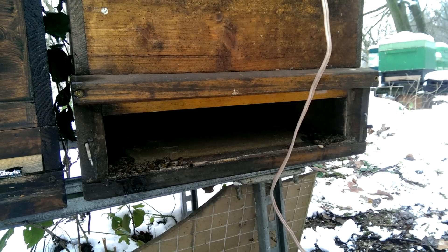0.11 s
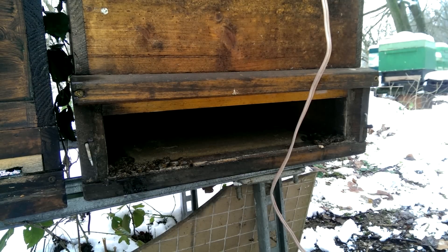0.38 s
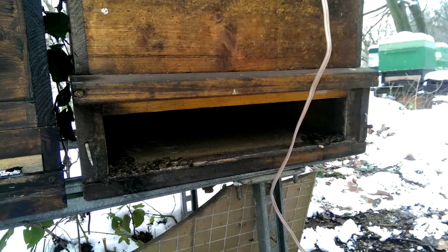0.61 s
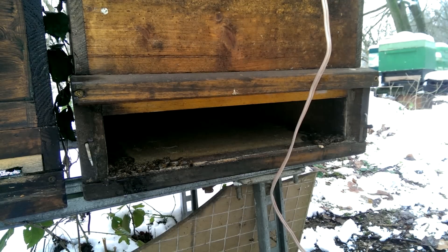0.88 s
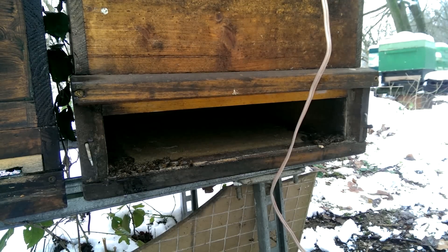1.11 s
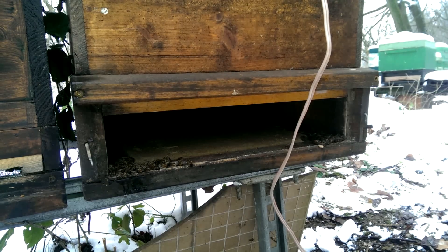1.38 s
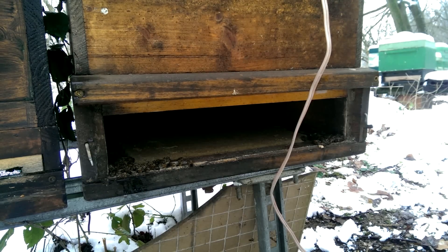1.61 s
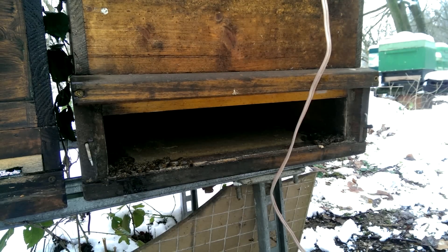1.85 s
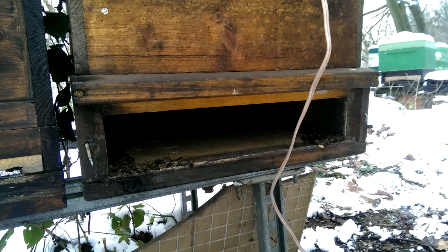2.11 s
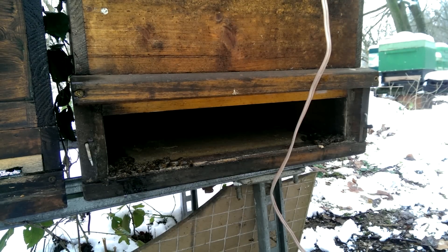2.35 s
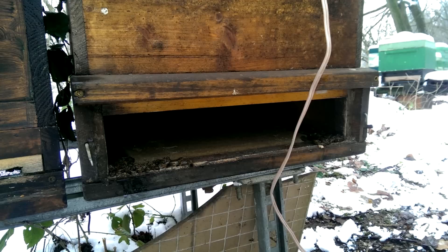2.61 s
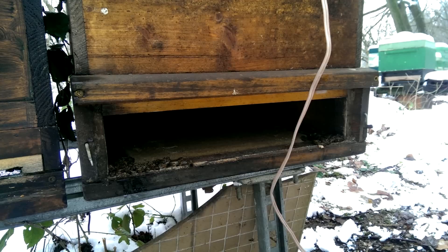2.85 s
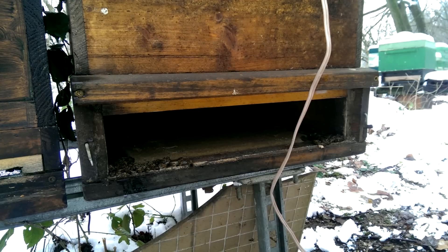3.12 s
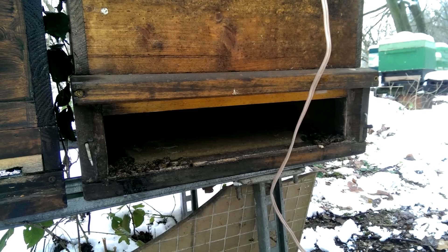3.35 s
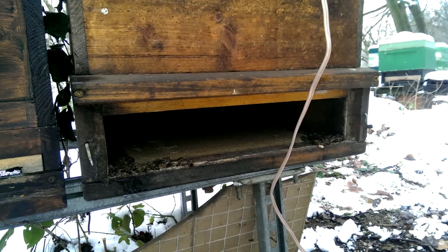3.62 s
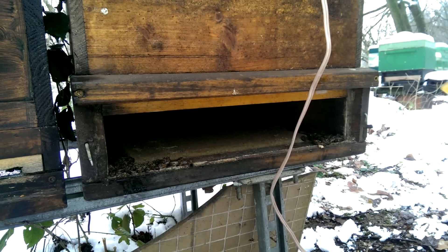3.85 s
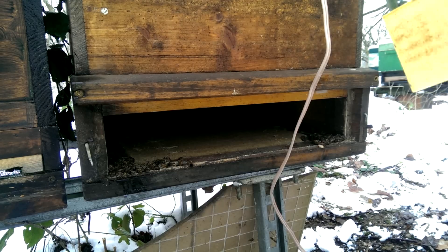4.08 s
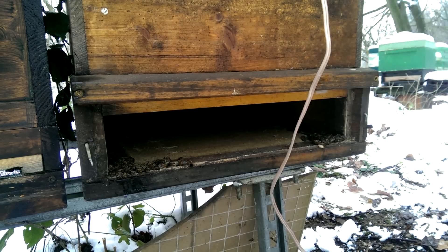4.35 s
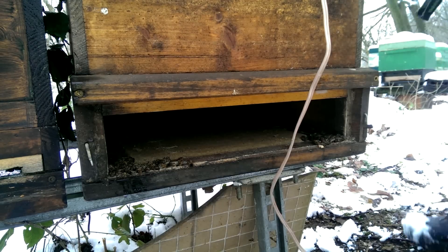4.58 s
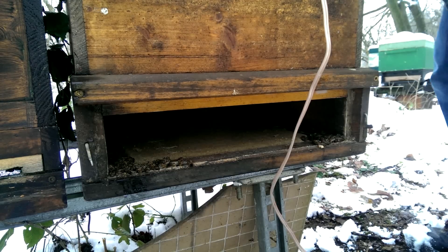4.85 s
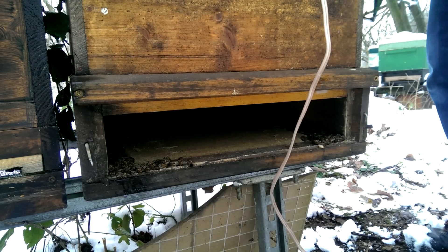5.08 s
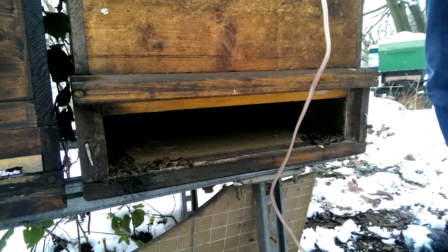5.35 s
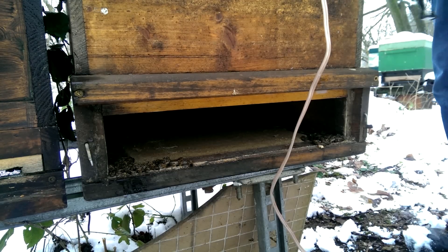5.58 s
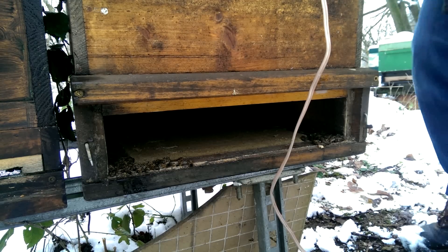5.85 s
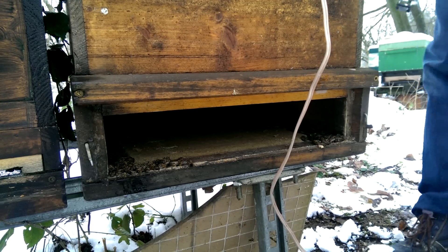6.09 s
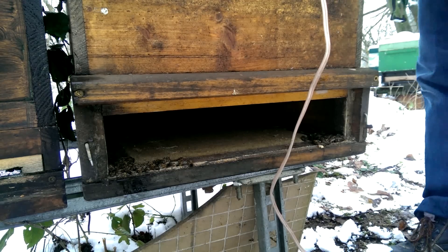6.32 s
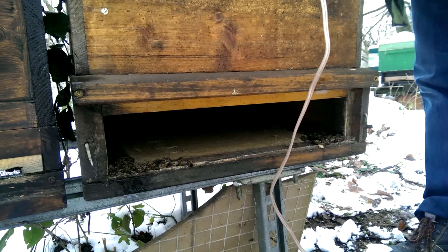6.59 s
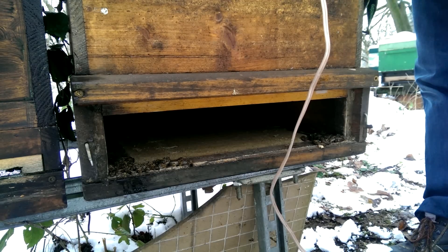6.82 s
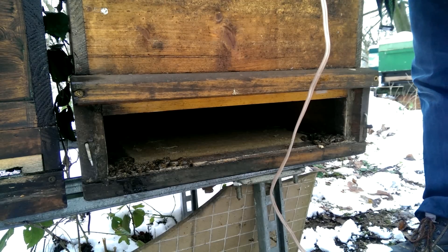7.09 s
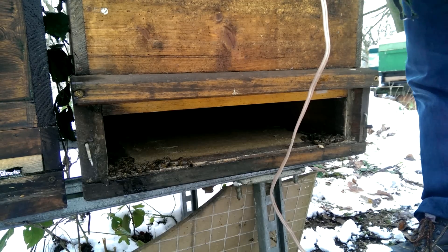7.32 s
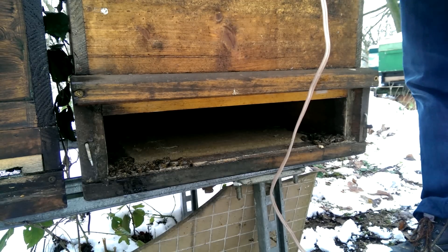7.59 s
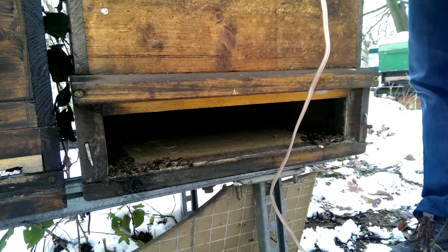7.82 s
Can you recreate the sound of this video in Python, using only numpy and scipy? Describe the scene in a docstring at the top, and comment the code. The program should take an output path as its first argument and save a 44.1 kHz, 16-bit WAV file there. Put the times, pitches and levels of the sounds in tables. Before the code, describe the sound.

Busy wooden rattling and sliding at a beehive, a sharp hard slam after three seconds, then sparse light taps and low hollow rubbing.

```python
"""Outdoors at a hive, wooden boards are slid, knocked and set down, a little to the right of a two-port microphone.
Each contact makes a crack of noise, a panel knock and a boom; dull bumps come alone or under a crack.
Slides are grainy noise for the scrape, wavering noise in the panels and plain noise booming in two boxes.
One board lands hard, edge after edge, rings in its own resonances and leaves a long ring.
Short echoes answer from nearby, over shaped noise for a far-off hiss and a low rumble."""
import sys
import numpy as np
from scipy import signal
from scipy.fft import rfft, irfft, next_fast_len
from scipy.io import wavfile
from scipy.ndimage import uniform_filter1d, map_coordinates

SR = 44100
rng = np.random.default_rng(int(sys.argv[2]) if len(sys.argv) > 2 else 0)


def boost(x):
    """Linear amplitude factor 10**(x/20) for a level x in decibels (scalar or array-like)."""
    u = np.asarray(x, float) / 20
    return 10 ** u


def wav_out(sig):
    """Save sig, one row per channel (or a flat mono array), as 16-bit PCM at SR to the path in sys.argv[1]."""
    wavfile.write(sys.argv[1], SR, np.round(np.clip(np.atleast_2d(sig).T, -1, 1) * 32767).astype(np.int16))


N = 350595  # length of the scene in samples

# Surroundings and place of the boards over time. Each row: time in seconds, rumble level in dB, hiss level in dB,
# left level over right level of the handling in dB, delay of its sharp sounds at the left port in ms.
AROUND = [(0, -61.5, -55.5, -0.5, 0.27), (2.9, -64, -55.5, -1, 0.31), (3.3, -69, -56, -2, 0.26),
          (3.8, -62.5, -54, -3.5, 0.23), (5.2, -60, -55, -2.5, 0.24), (6.6, -63.5, -54.5, -2, 0.11),
          (7.95, -65, -57.5, -0.5, 0.17)]
# The boom of the large box, then of the small one. Each row: pitch in Hz, width in Hz, level in dB.
BOX = [(104, 24, 0), (203, 20, 0)]
# Mostly the small box is handled, then mostly the large, duller one.
# Each row: time in seconds, share of the small box (0 to 1).
HANDLED = [(5.95, 0.86), (6.1, 0.056)]


def unit(x):
    """Scaled to an rms of 1."""
    return x / np.sqrt(np.mean(np.abs(x) ** 2) + 1e-20)


def along(points, hz):
    """Reads a curve of (Hz, value) points, with pitch on a log axis."""
    f, v = np.transpose(points)
    return np.interp(np.log(hz + 1), np.log(f + 1), v)


def curves(rows):
    """One value per sample for each column after the time."""
    s, *columns = np.transpose(rows)
    return np.array([np.interp(np.arange(N) / SR, s, column) for column in columns])


def wobble(rate):
    """A smooth random curve, with this many random points a second."""
    points = rng.standard_normal(int(N * rate / SR) + 4)
    return map_coordinates(points, [np.arange(N) * rate / SR])


def filtered(x, response):
    """Shapes a sound by a response over pitch, scaled so that white noise keeps its power."""
    size = 2 * next_fast_len(N // 2 + SR // 4)  # room for the ringing after the end
    gain = unit(response(np.fft.rfftfreq(size, 1 / SR)))
    return irfft(rfft(x, size) * gain, size)[..., :N]


def modes(table):
    """Sum of resonances, each ringing only after it is pushed; every second one has its sign flipped."""
    def response(f):
        total = 0
        for k, (center, width, db) in enumerate(table):
            damping = 1j * f * width
            total = total + (-1) ** k * boost(db) * damping / (center * center - f * f + damping)
        return total
    return response


def causal(points):
    """A filter with a given loudness curve over pitch that answers as early as possible (minimum phase)."""
    def response(hz):
        cepstrum = irfft(np.log(boost(along(points, hz)) + 1e-6))
        half = len(cepstrum) // 2
        cepstrum[1:half] *= 2
        cepstrum[half + 1:] = 0
        return np.exp(rfft(cepstrum))
    return response


def add(track, s, sound):
    """Mixes a sound in at a time in seconds."""
    part = track[..., round(s * SR):round(s * SR) + sound.shape[-1]]
    part += sound[..., :part.shape[-1]]


def burst(db, t60, rise):
    """A contact force that jumps up over rise seconds and falls by 60 dB in t60 seconds."""
    t = np.arange(SR // 4) / SR
    return boost(db - 60 * t / t60) * (1 - np.exp(-t / rise))


def boom(db, hz, t60):
    """The wood swings as a dying sine."""
    swing = np.sin(2 * np.pi * hz * np.arange(SR // 4) / SR)
    return -burst(db, t60, rise=0.31 / hz) * swing


def spread(count):
    """Noise from along a board's edge: partly common to both ports, partly each port's own."""
    common, *own = rng.standard_normal((3, count))
    return 0.47 * common + 1.194 * np.array(own)


def patchy(x, depth_db):
    """Random patches of pitch and time get louder or softer, as the contact moves along the board."""
    z = signal.stft(x, nperseg=512)[2]
    field = rng.standard_normal(z.shape[-2:])
    field = uniform_filter1d(field, size=3, axis=0)  # neighbours in pitch
    field = uniform_filter1d(field, size=7, axis=1)  # neighbours in time
    return unit(signal.istft(z * boost(depth_db * unit(field)), nperseg=512)[1][..., :N])


def background():
    """Far hiss, alike at both ports only in the bass, over a low rumble; the hiss wavers."""
    # Colour of the hiss. Each row: pitch in Hz, level in dB.
    hiss_color = [(47, 2), (80, 0.5), (159, 0), (237, -9), (461, -6.5), (672, -12), (785, -1.5), (1090, -6),
                  (1250, -2), (1430, -5.5), (2040, -5), (3170, -7), (6030, -25.5), (14300, -28),
                  (16000, -34)]
    # How alike the hiss is at both ports. Each row: pitch in Hz, likeness (1 the same, 0 unrelated, below 0 opposed).
    likeness = [(60, 0.9), (150, 0.86), (380, 0.82), (950, 0.21), (2380, -0.21), (5980, 0.081),
                (15000, -0.08)]

    def mid_and_side(hz):
        angle = np.arccos(np.clip(along(likeness, hz), -1, 1)) / 2
        return boost(along(hiss_color, hz)) * np.array([np.cos(angle), np.sin(angle)])

    rumble_db, hiss_db = curves(AROUND)[:2]
    mid, side = filtered(rng.standard_normal((2, N)), mid_and_side)
    hiss = boost(hiss_db - 1.0 + 1.07 * wobble(10)) * unit(np.array([mid + side, mid - side]))
    rumble_noise = rng.standard_normal(N) + 0.16 * rng.standard_normal((2, N))  # mostly common to both ports
    rumble = unit(filtered(rumble_noise, lambda f: modes([(49, 12, 0)])(f) ** 2))
    return hiss + boost(rumble_db + 4.0) * rumble


def strokes():
    """Sliding wood catches and slips: grainy noise drives the grit, wavering noise the panel, plain noise the box."""
    # Slides. Each row: start in seconds, length in seconds, scrape level in dB,
    # weight resting on the box in dB over the scrape.
    slides = [(0.018, .08, -50, 0.5), (0.124, 0.068, -46, -2), (0.259, 0.13, -40, -9),
              (0.417, 0.18, -28.5, -22), (0.581, 0.2, -36, -13.5), (0.787, 0.12, -28, -10.5),
              (0.946, 0.16, -33, -35), (1.247, .13, -42, -6.5), (1.371, 0.13, -37, -8),
              (1.505, 0.098, -40, -3), (1.662, .09, -52.5, -25), (1.911, .085, -44, -3),
              (2.024, 0.06, -36.5, -2.5), (2.064, 0.15, -30, -17.5), (2.189, 0.1, -34, -4.5),
              (2.278, .09, -32, -15), (2.325, 0.5, -45.5, -5), (2.532, 0.073, -38, -2),
              (2.641, 0.18, -33, -17), (2.83, 0.06, -35, -28.5), (3.222, 0.081, -33.5, 3),
              (3.276, 0.17, -49, -9), (3.433, 0.14, -45, -12), (3.567, 0.24, -57.5, -11),
              (4.082, 0.15, -50, -0.5), (4.192, .1, -51, -5), (4.29, 0.1, -51.5, -13),
              (4.685, .12, -42.5, -3.5), (4.787, 0.18, -52, -5), (4.951, 0.19, -51.5, -4.5),
              (5.49, 0.07, -56.5, 2), (5.7, 0.14, -54.5, -1.5), (5.814, 0.18, -57, -14),
              (6.146, 0.16, -54, 3.5), (6.589, 0.1, -76.5, 32), (6.675, 0.2, -61, 17),
              (6.877, 0.26, -64.5, 13), (7.122, 0.25, -70.5, 23), (7.347, 0.43, -71, 18.5),
              (7.557, 0.12, -52.5, -16), (7.678, 0.12, -41.5, -2), (7.799, 0.083, -60, 8)]
    panel_db, panel_feels = -7.5, 0.32  # panel hum in dB over the scrape; share of the weight's dB that reaches it
    linger_s = 0.0066  # how long the wood keeps rubbing
    power = np.zeros((3, N))
    for s, length, db, weight_db in slides:
        speed = np.sin(np.linspace(0, np.pi, int(length * SR)))  # the hand speeds up and slows down
        over_scrape_db = np.array([[0], [panel_db + panel_feels * weight_db], [weight_db]])
        add(power, s, (boost(db + over_scrape_db) * speed) ** 2)
    keep = np.exp(-1 / (linger_s * SR))
    scrape, hum, drag = np.sqrt(signal.lfilter([1 - keep], [1, -keep], power))
    catches = (rng.random(N) < 400 / SR) * boost(2.6 * rng.exponential(size=N))  # about 400 a second
    crackle = 1.0 + signal.lfilter([1], [1, -np.exp(-1 / (0.003 * SR))], catches)  # each fades over 3 ms
    grit = unit(crackle * patchy(spread(N), depth_db=2.4))
    rub = unit(boost(2.2 * wobble(70) + 4.3 * wobble(250)) * rng.standard_normal(N))
    return scrape * grit, hum * rub, drag * rng.standard_normal(N)


def yard(x):
    """Nearby boxes and ground answer: short scattered echoes, new every third of a second."""
    # How fast the echoes die. Each row: pitch in Hz, time to fall by 60 dB in seconds.
    echo_decay = [(200, 0.15), (1500, 0.051), (8000, 0.036)]
    out, step = np.zeros((2, N + SR)), SR // 3
    delay = 60  # samples
    for start in range(0, N, step):
        hz, t, z = signal.stft(rng.standard_normal((2, SR // 5)), SR, nperseg=128)
        z[1] = np.where(hz[:, None] < 600, z[0], z[1])  # long waves reach both ports alike
        fade = boost(-60 * t / along(echo_decay, hz)[:, None])
        tail = signal.istft(z * fade, SR, nperseg=128)[1]
        tail = tail / np.linalg.norm(tail[0])
        wet = signal.fftconvolve(x[None, start:start + step], tail, axes=1)
        out[:, start + delay:start + delay + wet.shape[1]] += wet
    return out[:, :N]


def knocks():
    """Each contact gives a force on the grit, a force on the panel and a boom pitched between the two boxes."""
    # Contacts. Each row: time in seconds, crack level in dB, panel knock in dB over the crack,
    # crack colour in Hz, time for the crack to fall by 60 dB in seconds.
    contacts = [(0.0228, -12, -17.5, 3670, 0.022), (0.1138, -31.5, -11.5, 3140, 0.034),
                (0.1405, -28.5, 0, 3400, 0.047), (0.2398, -37.5, -3, 2740, 0.051),
                (0.2809, -29, -10, 1310, 0.053), (0.422, -43.5, 8, 3140, 0.04),
                (0.4564, -16, -12.5, 2290, 0.029), (0.4833, -15, -5.5, 2900, 0.022),
                (0.5234, -26, -3.5, 3000, 0.029), (0.7811, -32.5, -0.5, 2530, 0.17),
                (0.836, -21, -17, 4170, 0.025), (0.8613, -20, -2.5, 2980, 0.02),
                (0.9217, -19, -12, 4000, 0.068), (1.176, -23, -19, 1560, 0.04),
                (1.2491, -42.5, -6, 2450, 0.037), (1.272, -18, -18.5, 3220, 0.039),
                (1.4678, -20.5, -14, 3080, 0.032), (1.5258, -29, -39, 4080, 0.071),
                (1.692, -37, -12.5, 2940, 0.024), (1.724, -37, -19, 3200, 0.028),
                (1.919, -30, 2, 2720, 0.066), (2.0336, -28, -8.5, 2950, 0.035),
                (2.1061, -18.5, -17, 3460, 0.023), (2.1654, -17, -10.5, 2290, 0.046),
                (2.1979, -25, -6, 2800, 0.029), (2.2912, -27.5, -10, 3130, 0.04),
                (2.5559, -29.5, -3, 2900, 0.053), (2.7086, -21, -34, 4160, 0.12),
                (3.308, -27.5, -16, 2610, 0.1), (4.122, -41, -6, 2670, 0.066),
                (4.724, -25, -14, 4100, 0.038), (4.7372, -26.5, -11.5, 3870, 0.028),
                (4.809, -42, -24, 3430, 0.036), (4.8553, -35, -15, 2120, 0.071),
                (4.928, -40, -16, 3360, 0.023), (5.0074, -42.5, -12, 3500, 0.027),
                (5.5076, -26.5, -16, 1260, 0.026), (6.604, -44.5, 1, 1250, 0.024),
                (6.6166, -25.5, -10, 1730, 0.047), (6.7226, -39, -4, 1240, 0.088),
                (6.7894, -36.5, -26, 1210, 0.035), (6.885, -32, -8, 1250, 0.049),
                (6.9313, -43, -14, 3070, 0.034), (6.9955, -46.5, 0, 1260, 0.058),
                (7.049, -31.5, -13, 1190, 0.051), (7.144, -33.5, -3.5, 1270, 0.056),
                (7.219, -40, -26, 1310, 0.052), (7.2811, -43.5, -15, 3860, 0.026),
                (7.5041, -33.5, -6, 1250, 0.05), (7.547, -32, -13.5, 1290, 0.041),
                (7.592, -24, -22.5, 1320, 0.028), (7.613, -37.5, -14, 1270, 0.045),
                (7.6536, -40, -21, 3990, 0.032)]
    grit, (panel, low), small = np.zeros((2, N)), np.zeros((2, N)), curves(HANDLED)[0]
    for s, db, panel_db, hz, t60 in contacts:
        share = small[round(s * SR)]
        crack = burst(db - 5.5, t60, rise=0.00055) * spread(SR // 4)
        crack[:, 1] -= boost(db + 1.5)  # the first touch is one sharp push
        crack = 0.85 * crack + 2.2 * signal.lfilter(*signal.iirpeak(hz, 3.5, SR), crack)
        dull = signal.lfilter(*signal.butter(4, 3600, fs=SR), crack)  # the large box
        add(grit, s, share * crack + (1 - share) * dull)
        knock = burst(db + panel_db + 1.0, t60=0.054, rise=0.000082) * rng.standard_normal(SR // 4)
        knock[1] -= boost(db + panel_db + 18.5)
        add(panel, s, knock)
        box_hz = share * BOX[1][0] + (1 - share) * BOX[0][0]
        add(low, s, boom(db + panel_db + 0.5, box_hz, t60=0.035))
    return grit, panel, low


def bumps():
    """Dull bumps, alone or under a crack: a soft push, a longer boom and a little panel noise."""
    # Bumps. Each row: time in seconds, push level in dB, boom in dB over the push, boom pitch in Hz.
    soft_bumps = [(0.578, -30.5, -10.5, 170), (0.784, -37, -2.5, 233), (0.86, -23, -2, 206),
                  (1.002, -35, -3.5, 218), (1.269, -46.5, 4, 92.5), (1.478, -30.5, -4, 209),
                  (2.106, -29.5, -5, 206), (2.552, -23.5, -22, 264), (3.252, -39.5, 12.5, 194.3),
                  (3.3205, -24.5, -21, 260), (3.325, -17, -18, 152), (3.356, -33, -27, 154),
                  (3.386, -35, -9, 157), (3.415, -33.5, -17, 161), (3.633, -32.5, -31, 168),
                  (4.155, -41, -12, 120), (4.179, -37.5, -11, 162), (4.247, -36.5, -13, 118),
                  (4.43, -48, -22, 246), (4.802, -34.5, -20, 182), (5.019, -40.5, -11, 254),
                  (5.821, -40, -10, 252), (5.87, -39, -17, 264), (5.885, -36, -19, 266),
                  (5.903, -37, -26, 253), (6.177, -53, 9.5, 73.5), (6.622, -33, -3.5, 239),
                  (6.645, -36, -9, 236), (6.727, -36, -2, 101), (6.748, -33.5, -20, 251),
                  (6.778, -33, -0.5, 98), (6.997, -50.5, 9, 103), (7.143, -35, -6, 104),
                  (7.147, -51, -8, 244), (7.215, -47, -12, 241), (7.235, -37.5, -1.5, 98),
                  (7.505, -40, -5, 238), (7.703, -36, -5, 202)]
    panel, low = np.zeros((2, N))
    for s, db, boom_db, hz in soft_bumps:
        push = boom(db + 13, 358, t60=0.0059)  # barely two swings
        add(low, s, push + boom(db + boom_db + 8.5, hz, t60=0.081))
        add(panel, s, burst(db - 0.5, t60=0.015, rise=0.0004) * rng.standard_normal(SR // 4))
    return panel, low


def slam():
    """A board set down hard: each edge crunches into its high modes and pushes its low ones."""
    # The edges landing one after another. Each row: time in seconds, blow level in dB.
    edge_blows = [(3.2354, -20.5), (3.2374, -16.5), (3.2415, -19), (3.2433, -35), (3.248, -54)]
    # Resonances of this board, the lid, three low and three high. Each row: pitch in Hz, width in Hz, level in dB.
    lid_modes = [(84, 60, -1), (183, 43, -2), (499, 78, 3.5), (1520, 920, -10), (2240, 1190, -4.5),
                 (4600, 1080, -9.5)]
    # The lid's long ring after landing: pitch in Hz, level in dB, time to fall by 60 dB in seconds.
    ring_hz, ring_db, ring_t60 = (495, -29, 0.3)
    force, (push, ring) = np.zeros((2, N)), np.zeros((2, N))
    for s, db in edge_blows:
        blow = burst(db + 8.0, t60=0.0089, rise=0.00009) * spread(SR // 4)
        blow[:, 1] -= boost(db + 19)
        add(force, s, blow)
        push[round(s * SR)] = -boost(db + 23.5)
    add(ring, edge_blows[1][0], boom(ring_db, ring_hz, ring_t60))
    snap = boost(-0.5) * filtered(force, modes(lid_modes[3:]))
    thud = filtered(push + 0.44 * force.mean(0), modes(lid_modes[:3])) + ring
    return snap, thud


def boards():
    """Contacts, bumps and slides share the panels; the slammed lid rings on its own."""
    # Colour of scrapes and cracks. Each row: pitch in Hz, level in dB.
    grit_color = [(530, -29.5), (900, -29), (1040, -14.5), (1360, -12), (1790, -10), (2040, -7.5),
                  (2300, -9), (2570, -6), (3110, -4.5), (4680, -11), (8660, -34.5), (10500, -45),
                  (15100, -39), (16000, -42)]
    # Resonances of the boards. Each row: pitch in Hz, width in Hz, level in dB.
    panel_modes = [(403, 165, 2), (670, 74, 6), (806, 52, 1.5), (989, 98, 2), (1250, 130, -1)]
    scrape, rub, drag = strokes()
    crack, knock, knock_low = knocks()
    bump, bump_low = bumps()
    snap, thud = slam()
    # dragging booms in both boxes, more in the small one early and in the large one late
    small = 0.14 + 0.5 * curves(HANDLED)[0]
    large_boom = filtered(drag * (1 - small), modes(BOX[:1]))
    small_boom = filtered(drag * small, modes(BOX[1:]))
    grit = filtered(crack + scrape, causal(grit_color)) + snap
    panel = filtered(knock + bump + rub, modes(panel_modes))
    return grit, panel + large_boom + small_boom + knock_low + bump_low + thud


def at_ports(left, right, lag_ms):
    """The left port, farther from the boards, hears later."""
    late = np.arange(N) - lag_ms * SR / 1000
    return np.array([map_coordinates(left, [late], order=5), right])


def scene():
    """Boards direct and echoed, placed left or right, over the background."""
    behind = background()
    grit, body = boards()
    pan_db, lag_ms = curves(AROUND)[2:]
    # long waves come from the whole hive, nearer the front
    direct = at_ports(*grit, lag_ms) + at_ports(body, body, 0.577 * lag_ms)
    echoes = boost(-2.5) * yard(grit.mean(0) + 0.47 * body)
    return boost(-3.11) * (direct + echoes) * boost([pan_db / 2, -pan_db / 2]) + behind


def roll_off(x):
    """The treble ends steeply here."""
    return signal.sosfilt(signal.butter(12, 16470, fs=SR, output="sos"), x)


def record(dry):
    """The microphone weakens the deepest bass, below about 42 Hz; nothing from 15830 Hz up is kept."""
    heard = filtered(dry, lambda hz: (1j * hz / (42 + 1j * hz)) ** 2 * (hz < 15830))
    return roll_off(heard)


dry = scene()
out = record(dry)
wav_out(out)
```